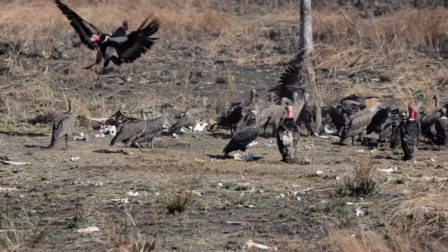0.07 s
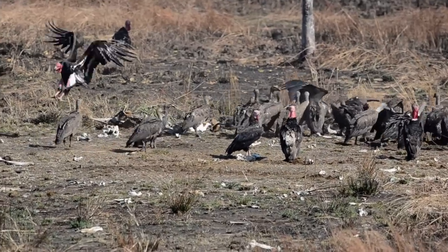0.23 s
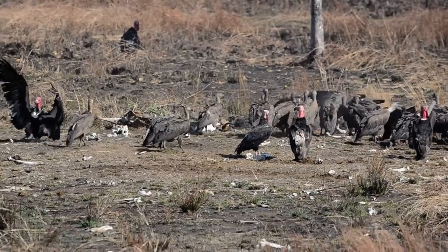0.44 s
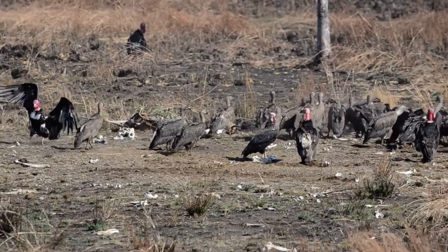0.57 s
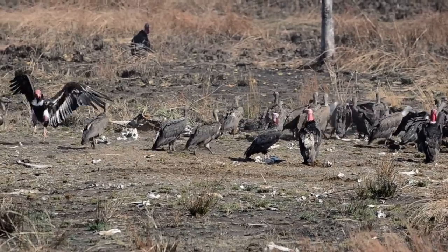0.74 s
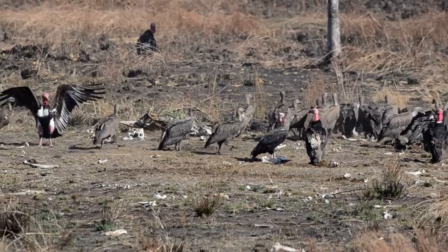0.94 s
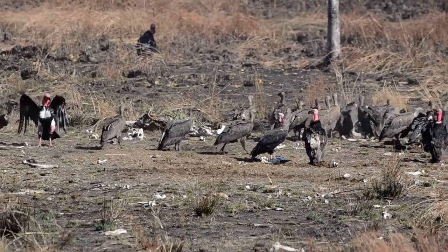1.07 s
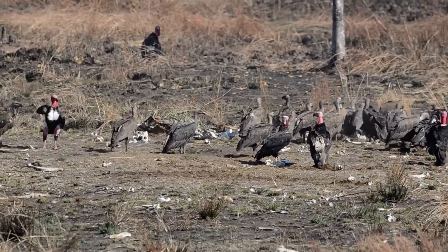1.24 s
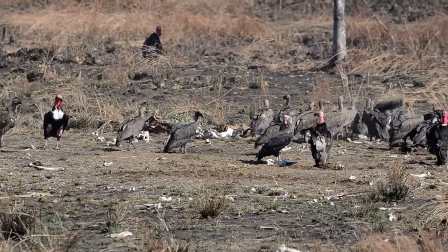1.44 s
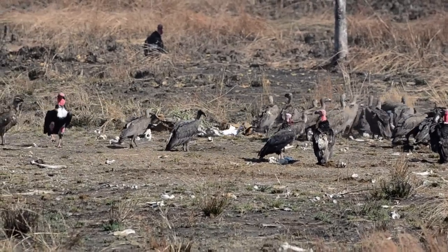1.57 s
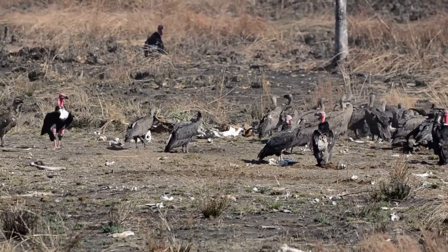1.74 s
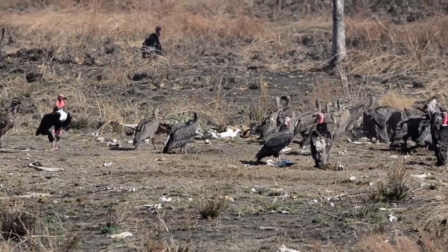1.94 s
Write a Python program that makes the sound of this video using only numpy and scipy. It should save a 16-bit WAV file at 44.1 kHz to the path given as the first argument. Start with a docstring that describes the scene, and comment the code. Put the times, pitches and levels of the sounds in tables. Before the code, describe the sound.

Two quick, close camera shutter clicks, followed by faint bird whistles and chirps outdoors.

```python
"""Air rushes softly over quiet, open bush, and the button of a nearby reflex camera clicks.
Its motor hums while it takes two quick pictures: each time the mirror slaps up, the shutter
curtains run, the mirror drops back and a latch catches. Light clicks and faint knocks follow.
Then thin whistles and a rough trill carry from far off, and a small bird gives three rattling chirps."""
import sys
import numpy as np
from scipy import signal
from scipy.fft import rfft, irfft
from scipy.io import wavfile
from scipy.ndimage import uniform_filter1d

SR = 44100
rng = np.random.default_rng(int(sys.argv[2]) if len(sys.argv) > 2 else 0)


def unload_audio(sound):
    """Save the sound as a 16-bit wav file, at the path given as the first command line argument."""
    columns = np.transpose(np.atleast_2d(sound))
    # keep every value between -1 and 1, then stretch to whole-number steps
    steps = np.round(np.clip(columns, -1, 1) * 32767)
    wavfile.write(sys.argv[1], SR, steps.astype(np.int16))


N = 88200
TIME = np.arange(N) / SR  # seconds since the scene began
AGE = TIME[:SR // 2]  # seconds since one short sound began

# The camera body's own tones; a fade time, here and below, is the time to die away by 60 dB.
# Columns: pitch_hz, fade_s, mirror_up_relative_db, mirror_down_relative_db
BODY_TONES = [(366.5, 0.089, -19, -31), (500.2, 0.2, -20, -30), (585.7, 0.071, -16.5, -17),
              (748, 0.25, -24.5, -22), (1021, 0.17, -18, -15.5), (1446, 0.16, -30, -15.5),
              (1480, 0.15, -11.5, -22), (1565, 0.11, -12, -18), (1664, 0.049, -12, -20),
              (1784, 0.062, -15, -22), (2480, 0.07, -14, -31), (2720, 0.03, -42, -11.5),
              (3226, .07, -30, -9.5), (3426, 0.083, -12, -18.5)]


def from_db(db):
    """Turn decibels into a number to multiply a sound by."""
    return 10 ** (np.asarray(db) / 20)


def rms_one(x):
    """Scale a sound so that its average strength (rms) is 1."""
    return x / np.sqrt(np.mean(x ** 2) + 1e-20)


def at_hz(points, hz):
    """Read between the rows of a table of pitches, giving each octave equal room."""
    pitches, values = np.transpose(points)
    return np.interp(np.log(hz), np.log(pitches), values)


def band(x, low_hz, high_hz):
    """Keep the part of a sound between two pitches."""
    edges = [low_hz, min(high_hz, .48 * SR)]
    return signal.sosfilt(signal.butter(2, edges, "band", fs=SR, output="sos"), x)


def hiss(low_hz, high_hz, samples=len(AGE)):
    """Noise of strength 1 between two pitches."""
    return rms_one(band(rng.standard_normal(samples), low_hz, high_hz))


def drift(turns_per_s):
    """A random wander, mostly between -1 and 1."""
    return np.interp(TIME * turns_per_s, np.arange(4000), rng.standard_normal(4000))


def add(out, start_s, sound):
    """Mix a sound in at the given time."""
    start = max(int(start_s * SR), 0)
    out[start:start + len(sound)] += sound[:N - start]


def dying(fade_s, rise_s=0.0015, hold_s=0):
    """A loudness curve that rises quickly and starts to die away at hold_s."""
    return np.minimum(AGE / rise_s, 1) * np.exp(-np.log(1000) * np.maximum(AGE - hold_s, 0) / fade_s)


def ringing(tones, rise_s, hold_s):
    """Tones that swell and die away, given as rows of pitch_hz, fade_s, level_db."""
    out = 0
    for hz, fade_s, db in tones:
        wave = np.sqrt(2) * np.sin(2 * np.pi * (hz * AGE + rng.random()))
        out = out + from_db(db) * dying(fade_s, rise_s, hold_s) * wave
    return out


def clatter(colour, fade_scale, rise_s, hold_s):
    """Two nearly equal strikes on a part whose countless close tones blur into fading noise."""
    # How long each pitch rings before fade_scale is applied. Columns: pitch_hz, fade_s
    ring_times = [(200, 0.27), (530, 0.23), (1400, 0.15), (3700, 0.16), (10000, 0.13)]
    edges = np.geomspace(110, 16000, 30)
    centres = np.sqrt(edges[1:] * edges[:-1])
    power = from_db(at_hz(colour, centres)) ** 2 * np.diff(edges)
    shared = rng.standard_normal((2, 1, len(AGE)))
    noise = shared + 0.18 * rng.standard_normal((2, 2, len(AGE)))  # each strike varies a little
    out = 0
    for k, hz in enumerate(centres):
        shape = dying(fade_scale * at_hz(ring_times, hz), rise_s, hold_s)
        part = band(noise[k % 2] * shape, edges[k], edges[k + 1])
        energy = power[k] / power.sum() * np.sum(shape ** 2)
        out = out + part * np.sqrt(energy / np.sum(part ** 2, axis=1, keepdims=True))
    return out


def moving_part(contacts, colour, tones, fade_scale, rise_s, hold_s, crack_db):
    """Each contact of a camera part clatters and cracks; the first in each picture starts its tones."""
    out = np.zeros(N)
    for *starts, db in contacts:
        crack = hiss(2160, 11100) * dying(fade_s=0.02, rise_s=0.00021)
        for start_s, strike in zip(starts, clatter(colour, fade_scale, rise_s, hold_s)):
            add(out, start_s, from_db(db) * strike)
            add(out, start_s + rise_s, from_db(db + crack_db) * crack)
    for start_s in contacts[0][:2]:
        add(out, start_s, tones)
    return out


def scattered(x, tail_db, fade_s):
    """The bush scatters a sound into many tiny echoes that trail behind it."""
    echoes = rng.standard_normal(len(AGE)) * dying(fade_s)
    return x + from_db(tail_db) * signal.fftconvolve(x, echoes / np.linalg.norm(echoes))[:N]


def air():
    """The soft, steady rush of open country."""
    # How strong the rush is from low to high. Columns: pitch_hz, relative_db
    colour = [(15, -59), (25, -20), (148, -3.5), (225, -3), (290, -1), (421, -1.5), (919, -4),
              (2360, -10.5), (2850, -11.5), (5280, -20), (5880, -21.5), (8580, -27), (15500, -40)]
    hz = np.maximum(np.fft.rfftfreq(N, 1 / SR), 1)
    rush = irfft(rfft(rng.standard_normal(N)) * from_db(at_hz(colour, hz)), N)
    return rms_one(rush) * from_db(-57.5)


def button_clicks():
    """The button and grip click lightly, each click with two short metallic tones."""
    # The clicks. Columns: start_s, level_db, low_tone_hz, low_tone_db, high_tone_hz, high_tone_db
    clicks = [(0.1, -59, 5340, -58.5, 8400, -67.5), (0.608, -51, 6480, -56, 8000, -59),
              (0.612, -68, 2775, -47.5, 8250, -59)]
    # How strong a click is from low to high. Columns: pitch_hz, relative_db
    colour = [(400, -17), (2000, -5), (3400, -4), (5000, -12), (8400, -10), (10000, -26), (12200, -22),
              (14000, -36)]
    fade_s = 0.05
    out = np.zeros(N)
    for start_s, db, low_hz, low_db, high_hz, high_db in clicks:
        click = clatter(colour, fade_scale=0.45, rise_s=0.00037, hold_s=0.00086)[0]
        tones = ringing([(low_hz, fade_s, low_db), (high_hz, fade_s, high_db)], rise_s=0.0013, hold_s=0)
        add(out, start_s, from_db(db) * click + tones)
    return out


def motor():
    """The motor gives a low, uneven hum while it winds the camera."""
    # How the hum swells and sinks. Columns: time_s, level_db
    swell = [(.22, -101), (.26, -62.5), (.32, -62), (.47, -61), (.56, -65), (0.659, -68)]
    times, db = np.transpose(swell)
    pitch_hz = 152 + 21.3 * drift(88.8)
    level_db = np.interp(TIME, times, db, left=-np.inf, right=-np.inf) + 0.5 * drift(66.5)
    return np.sqrt(2) * from_db(level_db) * np.sin(2 * np.pi * np.cumsum(pitch_hz) / SR)


def mirror_up():
    """The mirror slaps up and sets the camera body ringing."""
    # The rising mirror's hits. Columns: first_picture_s, second_picture_s, level_db
    contacts = [(.2302, .3777, -22.5), (.2436, .3924, -23)]
    # How strong their clatter is from low to high. Columns: pitch_hz, relative_db
    colour = [(88, -59), (150, -49), (346, -7.5), (877, -9.5), (1000, -5), (1240, -3.5), (1700, 1.5),
              (2760, -5), (3480, -2.5), (3830, -7.5), (5870, -16.5), (6350, -15.5), (10100, -18),
              (13500, -44), (15500, -59)]
    body = [(hz, fade_s, db) for hz, fade_s, db, _ in BODY_TONES]
    tones = from_db(-22) * ringing(body, rise_s=0.015, hold_s=0.014)
    return moving_part(contacts, colour, tones, fade_scale=0.56, rise_s=0.002, hold_s=0.0022, crack_db=-40)


def curtains():
    """The shutter curtains run across, clattering and ringing."""
    # The curtains' hits. Columns: first_picture_s, second_picture_s, level_db
    contacts = [(.2812, .4222, -28.5), (.2902, .4315, -33.5)]
    # How strong their clatter is from low to high. Columns: pitch_hz, relative_db
    colour = [(88, -51), (150, -17.5), (346, -4.5), (812, -5), (1510, 5.5), (2310, 4), (2700, 0),
              (3620, -3), (5760, -5), (6110, -6.5), (10100, -6.5), (15500, -51)]
    # The tones they set ringing. Columns: pitch_hz, fade_s, relative_db
    curtain_tones = [(335, 0.18, -15), (1700, 0.082, -12), (2300, 0.13, -3.5), (2450, 0.05, -3.5)]
    tones = from_db(-35.5) * ringing(curtain_tones, rise_s=0.01, hold_s=0.013)
    return moving_part(contacts, colour, tones, fade_scale=0.71, rise_s=0.004, hold_s=0.003, crack_db=-13)


def mirror_down():
    """The mirror drops back, rings the body and at once bounces, more weakly."""
    # The falling mirror's hits. Columns: first_picture_s, second_picture_s, level_db
    contacts = [(.3086, .4499, -25), (.3120, .4532, -25), (.3178, .4590, -35.5)]
    # How strong their clatter is from low to high. Columns: pitch_hz, relative_db
    colour = [(88, -47), (150, -26), (420, -20), (561, -10), (1040, -12), (1150, -15), (1450, -3.5),
              (2020, -3), (2860, -0.5), (4650, -13), (5130, -6.5), (5760, -9), (8490, -9), (10500, -11),
              (15500, -50)]
    body = [(hz, fade_s, db) for hz, fade_s, _, db in BODY_TONES]
    tones = from_db(-24.5) * ringing(body, rise_s=0.0019, hold_s=0.0066)
    drop = moving_part(contacts, colour, tones,
                       fade_scale=0.6, rise_s=0.0012, hold_s=0.00064, crack_db=-22)
    bounce = from_db(-18) * np.interp(TIME - 0.001196, TIME, drop)
    return drop + bounce


def latch():
    """A latch catches with a small click and one very short tone."""
    # The latch's hit. Columns: first_picture_s, second_picture_s, level_db
    contacts = [(.3440, .4852, -37)]
    # How strong its clatter is from low to high. Columns: pitch_hz, relative_db
    colour = [(200, -46), (900, 1), (1800, -1), (2300, 1), (3000, -5), (5700, -13.5), (9500, -13.5),
              (15000, -35)]
    tone = ringing([(2300, 0.01, -29.5)], rise_s=0.0014, hold_s=0.0013)
    return moving_part(contacts, colour, tone,
                       fade_scale=0.62, rise_s=0.0011, hold_s=0.0027, crack_db=-19)


def knocks():
    """Handling the camera makes faint, dull knocks and rustles."""
    # The knocks. Columns: start_s, level_db, pitch_hz, fade_s
    bumps = [(.576, -48.5, 1690, 0.045), (0.914, -56, 3500, 0.046), (.932, -55.5, 2840, 0.081),
             (1.624, -51.5, 942, 0.15), (1.662, -52, 950, 0.17)]
    out = np.zeros(N)
    for start_s, db, hz, fade_s in bumps:
        add(out, start_s, from_db(db) * dying(fade_s) * hiss(hz / 1.53, hz * 1.19))
    return out


def whistles():
    """Distant birds whistle thin, wavering tones that echo in the bush."""
    # The tunes, one list for each whistle. Columns: time_s, pitch_hz, relative_db
    tunes = [
        [(1.145, 2985, -70), (1.17, 2940, -63), (1.225, 2700, -61), (1.275, 2733, -57), (1.30, 2710, -70)],
        [(1.212, 2500, -63), (1.255, 2280, -61)],
        [(1.335, 2335, -62), (1.392, 2490, -59), (1.436, 2385, -55), (1.55, 2586, -59), (1.61, 2455, -66),
         (1.665, 2510, -58), (1.72, 2425, -64), (1.79, 2570, -62), (1.86, 2410, -65), (1.93, 2504, -62.5),
         (2.0, 2380, -64)],
        [(1.84, 3050, -66), (1.875, 3020, -64), (1.915, 2790, -58.5), (1.97, 2760, -68)],
    ]
    out = 0
    for tune in tunes:
        times, hz, db = np.transpose(tune)
        pitch_hz = np.interp(TIME, times, hz) * (1 + 0.0056 * drift(150))
        level_db = np.interp(TIME, times, db, left=-np.inf, right=-np.inf) + 2 * drift(81)
        loudness = uniform_filter1d(from_db(level_db), size=400)  # softens the start and end
        out = out + np.sqrt(2) * loudness * np.sin(2 * np.pi * np.cumsum(pitch_hz) / SR)
    return from_db(-4.5) * scattered(out, tail_db=-10, fade_s=.4)


def trill():
    """Distant insects or birds make a rough trill, heard as a narrow band of noise."""
    # How the trill swells. Columns: time_s, level_db
    swell = [(1.25, -78), (1.45, -68), (1.65, -62), (2.0, -64)]
    times, db = np.transpose(swell)
    return hiss(2270, 2610, samples=N) * from_db(np.interp(TIME, times, db, left=-np.inf))


def chirps():
    """A small bird chirps: a soft first note, then a rattle of quick syllables over a breathy rasp."""
    # The chirps. Columns: start_s, base_level_db, base_pitch_hz, syllable_spacing_s, length_s
    calls = [(1.2802, -46.5, 4620, .0179, 0.08), (1.4830, -44.5, 4800, .0186, 0.068),
             (1.7072, -46, 4740, .0187, 0.068)]
    # One syllable, a downward flick and then an arch. Columns: time_s, pitch_ratio, relative_db
    syllable = [(0, 1.08, -14), (.0019, .96, -7), (.0038, .8, -13), (.0062, 1.02, 1), (.0086, .98, -6),
                (.0115, .965, 2.5), (.0148, .89, -4), (.018, .68, -17)]
    # How loud each syllable is in turn: relative_db
    syllable_db = (-3, -2, -3.5, -5.5, -6)
    lead_s, lead_hz, release_s, tail_s = 0.012, 3680, 0.004, .04
    sag_per_s, wobble = 0.577, .016  # both as shares of the pitch
    times, pitch_ratio, shape_db = np.transpose(syllable)
    out = np.zeros(N)
    for start_s, db, base_hz, spacing_s, length_s in calls:
        age = AGE[AGE < length_s]
        which, within_s = (age / spacing_s).astype(int), age % spacing_s
        bend = 1 - sag_per_s * age + wobble * drift(587)[:len(age)]
        pitch_hz = base_hz * np.interp(within_s, times, pitch_ratio) * bend
        level_db = db + np.take(syllable_db, which, mode="clip") + np.interp(within_s, times, shape_db)
        flutter_db = 0.72 * drift(440)[:len(age)]
        loudness = from_db(level_db + flutter_db) * np.minimum((length_s - age) / release_s, 1)
        loudness = uniform_filter1d(loudness, size=40, mode="constant")
        phase = 2 * np.pi * np.cumsum(pitch_hz) / SR
        voice = np.sin(phase) + from_db(-30) * np.sin(2 * phase)  # with a faint tone an octave up
        rasp = from_db(db - 17) * hiss(2920, 5050) * dying(tail_s, lead_s, lead_s + length_s)
        first_note = ringing([(lead_hz, spacing_s, db - 18)], rise_s=0.0035, hold_s=0.0088)
        add(out, start_s - lead_s, rasp + first_note)
        add(out, start_s, np.sqrt(2) * loudness * voice)
    return scattered(out, tail_db=-9.5, fade_s=tail_s)


def scene():
    """The camera in front, birds and air behind, in one channel."""
    camera = button_clicks() + motor() + mirror_up() + curtains() + mirror_down() + latch() + knocks()
    return (air() + camera + whistles() + trill() + chirps())[None]


def record(dry):
    """The microphone has two narrow dips in the treble; everything above 15750 Hz is cut."""
    # The dips. Columns: pitch_hz, narrowness_q, depth (0 to 1)
    dips = [(5695, 9.3, 0.88), (6850, 25, 1)]
    for hz, q, depth in dips:
        notched = signal.lfilter(*signal.iirnotch(hz, q, fs=SR), dry)
        dry = dry + depth * (notched - dry)
    return signal.sosfilt(signal.ellip(10, .2, 70, 15750, fs=SR, output="sos"), dry)


dry = scene()
out = record(dry)
unload_audio(out)
```